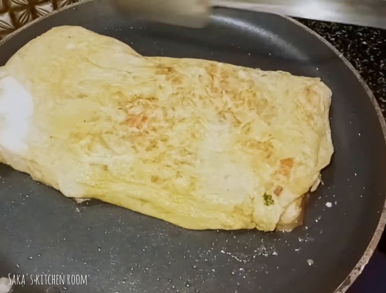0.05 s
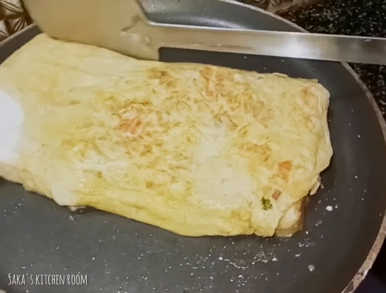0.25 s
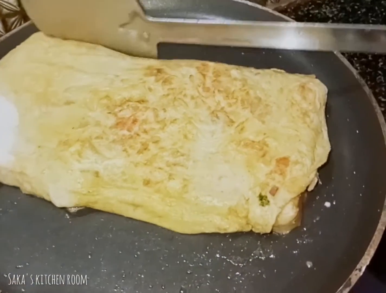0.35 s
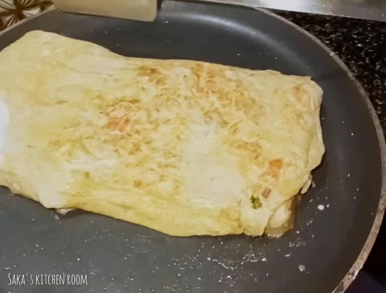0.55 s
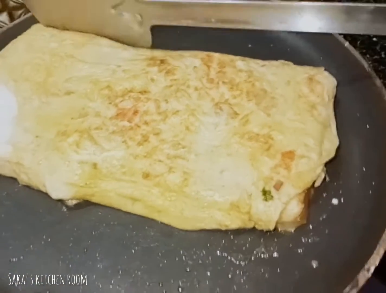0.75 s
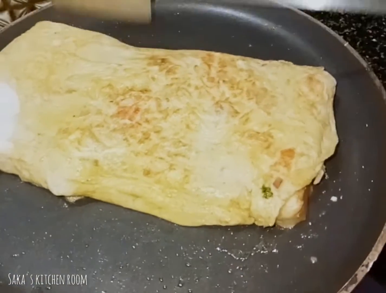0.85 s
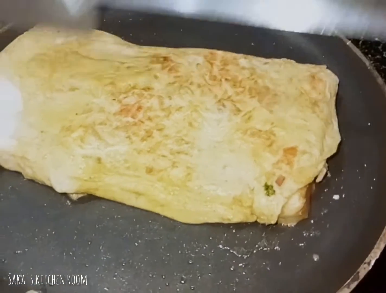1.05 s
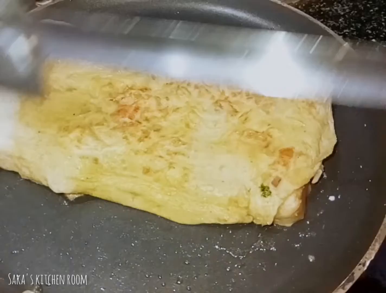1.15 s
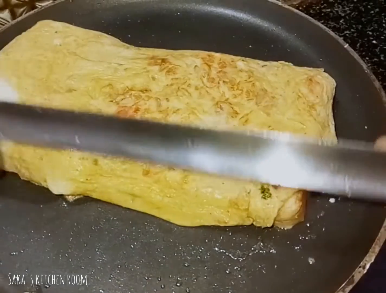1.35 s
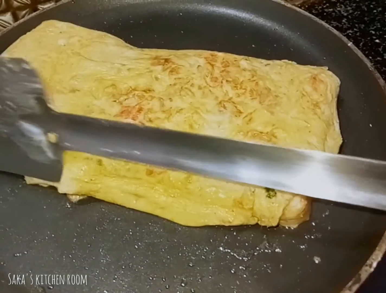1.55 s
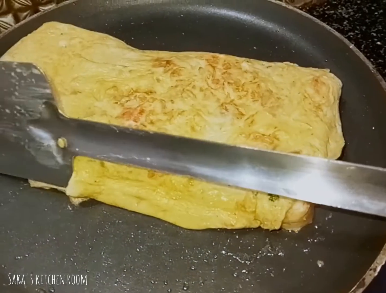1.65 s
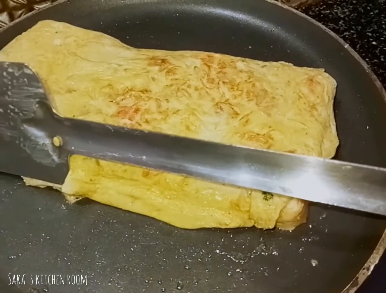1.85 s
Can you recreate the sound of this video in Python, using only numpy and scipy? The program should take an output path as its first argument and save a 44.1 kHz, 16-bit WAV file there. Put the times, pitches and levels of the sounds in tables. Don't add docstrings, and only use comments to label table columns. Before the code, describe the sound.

Steel spatula clanks on a coated pan, once then twice quickly, with soft fizzing oil

```python
import sys
import numpy as np
from scipy import signal
from scipy.fft import rfft, irfft
from scipy.io import wavfile
from scipy.ndimage import map_coordinates

SR = 44100
rng = np.random.default_rng(int(sys.argv[2]) if len(sys.argv) > 2 else 0)


def field_ratio(decibels):
    return 10 ** (np.asarray(decibels, dtype=float) / 20)


def int16_out(signal):
    q = np.round(np.clip(np.atleast_2d(signal).T, -1, 1) * 32767)
    wavfile.write(sys.argv[1], SR, q.astype(np.int16))


N = 83790


def unit(x):
    return x / np.sqrt(np.mean(x ** 2) + 1e-20)


def along(points, hz):
    point_hz, value = np.transpose(points)
    return np.interp(np.log(hz + 1), np.log(point_hz + 1), value)


def coloured(x, points):
    size = 2 ** 12
    gain = field_ratio(along(points, np.fft.rfftfreq(size, 1 / SR)))
    cepstrum = irfft(np.log(gain + 1e-6), size)
    cepstrum[1:size // 2] *= 2
    cepstrum[size // 2 + 1:] = 0
    response = irfft(np.exp(rfft(cepstrum)), size)
    return signal.fftconvolve(x, response)[:len(x)]


def wobble(rate, count):
    knots = rng.standard_normal(int(count * 200 / SR) + 4)
    return map_coordinates(knots, [np.arange(count) * min(rate, 199) / SR])


def add(track, x, s):
    part = track[round(s * SR):][:len(x)]
    part += x[:len(part)]


# pitch_hz [Hz], fade_s [s]
KITCHEN_FADE = [(100, 0.87), (300, 0.63), (1000, 0.52), (3000, 0.53), (6000, 0.37), (12000, 0.47)]


def kitchen(x):
    hz, t, z = signal.stft(rng.standard_normal(SR * 3 // 4), SR, nperseg=256)
    fade_db = -60 * t / along(KITCHEN_FADE, hz)[:, None]
    tail = signal.istft(z * field_ratio(fade_db), SR, nperseg=256)[1]
    delayed = np.pad(x, (130, 0))
    return signal.fftconvolve(delayed, tail / np.linalg.norm(tail))


# pitch_hz [Hz], level_db [dB per Hz]
AIR_COLOUR = [(25, -28), (60, 2.5), (120, -0.5), (250, -6.5), (1000, -9.5), (3000, -9), (8000, -17),
              (15500, -23.5)]


def air():
    level_db = -62 + 2.4 * wobble(4.03, count=N)
    return field_ratio(level_db) * unit(coloured(rng.standard_normal(N), AIR_COLOUR))


# start_s [s], level_db [dB]
FIZZ_ACTIVITY = [(0, -52), (.19, -49.5), (.205, -60), (.3, -50), (.5, -55), (.8, -56), (.85, -57.5),
                 (0.949, -55.5), (1.06, -61), (1.1, -52.5), (1.3, -53.5), (1.35, -61), (1.418, -53),
                 (1.6, -62), (1.8, -52), (1.9, -56)]
# pitch_hz [Hz], level_db [dB per Hz]
FIZZ_COLOUR = [(600, -40), (1800, -21.5), (3300, -7.5), (4300, 2.5), (5400, -0.5), (6600, -15.5),
               (10000, -11.5), (15500, -60)]


def fizz():
    bubbles, spread_db = 500, 8
    place, rarity, side = rng.random((bubbles, 3)).T
    size = field_ratio(-spread_db * np.log(rarity + 1e-4)) * np.sign(side - .5)
    bursts = unit(np.bincount((place * N).astype(int), np.clip(size, -6, 6), N))
    envelope = np.convolve(abs(bursts), np.hanning(48), 'same')
    grains = unit(envelope * rng.standard_normal(N))
    mix = field_ratio(-4) * grains + field_ratio(-1) * rng.standard_normal(N)
    s, level_db = np.transpose(FIZZ_ACTIVITY)
    swell_db = np.interp(np.arange(N) / SR, s, level_db) + 0.61 * wobble(16.44, count=N)
    return unit(coloured(mix, FIZZ_COLOUR)) * field_ratio(swell_db - 3.5)


# start_s [s], peak_db [dB], pitch_hz [Hz], click_db [dB]
OIL_SPITS = [(0.01, -36, 4740, -10), (0.0254, -41.5, 4800, -8), (0.0573, -40, 4470, -1.5),
             (0.1101, -39, 5040, -7), (0.1141, -40, 4280, -13.5), (0.154, -33.5, 4870, -8),
             (0.1714, -50.5, 4850, 5), (0.19, -43.5, 4440, 1), (0.4795, -35, 4630, -15.5),
             (0.5366, -39.5, 4540, -9), (0.6832, -45, 5020, -22), (0.7618, -40, 4340, -30),
             (0.8664, -40, 4710, -14), (0.9354, -42.5, 5200, -32), (0.9537, -36, 4400, -14),
             (1.0909, -39.5, 4360, -7), (1.1298, -43, 4650, -8.5), (1.1559, -40.5, 4600, -16),
             (1.1731, -36.5, 5000, -11.5), (1.1898, -36, 4420, -22.5), (1.2126, -42, 4700, -5),
             (1.231, -39.5, 4530, -7), (1.2488, -38, 4950, -10.5), (1.266, -35.5, 4470, -12.5),
             (1.2887, -37, 4460, -22), (1.3314, -45, 4600, -11), (1.3697, -32.5, 4400, -9.5),
             (1.7357, -44, 3460, -6.5), (1.8128, -40.5, 4450, -7.5), (1.844, -49.5, 4500, 1)]
# pitch_hz [Hz], level_db [dB per Hz]
CLICK_COLOUR = [(500, -52.5), (1200, -5.5), (3000, -9), (8500, -3.5), (12000, -13.5), (15500, -12.5)]


def spits():
    low_hz, low_db, room_db = 1523, -14.5, -3
    swell_s = .0004
    out, t = np.zeros(N), np.arange(SR // 50) / SR
    pulse = (t / swell_s) ** 2 * np.exp(-t / swell_s)
    noises = rng.standard_normal((len(OIL_SPITS), len(t)))
    for (s, peak_db, hz, click_db), noise in zip(OIL_SPITS, noises):
        tone = np.sin(2 * np.pi * hz * t)
        low = field_ratio(low_db) * np.sin(2 * np.pi * low_hz * t)
        click = unit(coloured(noise, CLICK_COLOUR)) * field_ratio(click_db)
        add(out, field_ratio(peak_db + 3) * pulse * (tone + low + click), s - swell_s / 2)
    return out + field_ratio(room_db) * kitchen(out)[:N]


# start_s [s], fullest_s [s], end_s [s], level_db [dB]
SLIDES = [
    (.29, 0.39, .46, -47.5),
    (1.04, 1.167, 2.4, -65.5),
]
# pitch_hz [Hz], level_db [dB per Hz]
SCRAPE_COLOUR = [(500, -26.5), (1200, -1), (1900, -0.5), (3200, 13.5), (5000, 0), (9000, -38.5)]


def scrape():
    t = np.arange(N) / SR
    stroke = np.zeros(N)
    for start, fullest, end, level_db in SLIDES:
        stroke += field_ratio(level_db) * np.interp(t, [start, fullest, end], [0, 1, 0])
    grit = field_ratio(2 * wobble(38.8, count=N))
    return grit * stroke * unit(coloured(rng.standard_normal(N), SCRAPE_COLOUR))


def ringing(pitches, modes, wander, t):
    total = np.zeros(len(t))
    for hz, (level_db, fade_s) in zip(pitches, modes):
        drift = wander * min(1, .5 + hz / 4000) * wobble(46.6, count=len(t))
        tone = np.sin(2 * np.pi * hz * t + drift)
        twin = 0.22 * np.sin(2 * np.pi * hz * 1.004 * t)
        total += field_ratio(level_db - 60 * t / fade_s) * (tone + twin)
    return total


# start_s [s], level_db [dB]
RATTLES = [
    (.244, -5),
    (.253, -21),
]


def rattling(s, t):
    total = np.zeros(len(t))
    for at, level_db in RATTLES:
        late = np.maximum(t + s - at, 0)
        burst = field_ratio(level_db - 60 * late / 0.05) * (1 - np.exp(-late / 0.0033))
        total += (at > s) * burst
    return total


KNOCK_S = [
    .2258,
    1.4326,
    1.5247,
]
# peak_db [dB], rise_s [s], clatter_fade_s [s to -60 dB], ring_db [dB], room_db [dB]
KNOCKS = [
    (-2.5, 0.00061, 0.12, -19, -6.5),
    (-11, 0.00064, 0.16, -14, -4.5),
    (-7.5, 0.0004, 0.29, -16, -10.5),
]
RIM_HZ = [328, 600, 958, 1387, 1452, 1873, 2098, 2529, 2647, 2915, 3280, 3700, 4936, 5981]
BLADE_HZ = [320, 480, 607, 921, 1577, 2309, 2905, 3720, 4156, 5152, 5992, 6799, 7784, 8570]
FLOOR_HZ = [318, 383, 482, 600, 958, 1380, 1576, 1667, 2229, 2309, 2907, 2990, 3634, 4285]
# level_db [dB], fade_s [s to -60 dB]
RIM_RING = [(-12.5, 0.31), (-2.5, 0.14), (-4.5, 0.084), (7, 0.083), (3, 0.1), (-8.5, 0.35), (-11.5, 0.54),
            (-5, 0.3), (-10.5, 0.43), (-5.5, 0.15), (6, 0.039), (3, .05), (-5, 0.066), (-5, 0.095)]
# level_db [dB], fade_s [s to -60 dB]
BLADE_RING = [(-7, .3), (-6, .15), (-6, .2), (-7, .19), (-5, .35), (-6, .25), (-8, .45), (-5, .09),
              (-1, .24), (-9, .4), (-2, .24), (-11, .34), (-22, .2), (-22, .19)]
# level_db [dB], fade_s [s to -60 dB]
FLOOR_RING = [(-10, .6), (-15, .6), (-7, .22), (-7, .2), (-7, .4), (-5, .22), (-1, .28), (-3, .2), (-6, .5),
              (-5, .3), (-3, .62), (-6, .2), (-5, .45), (-7, .28)]
WANDER = (1.3, .2, .2)
# pitch_hz [Hz], level_db [dB per Hz]
CLATTER_COLOURS = [
    [(60, -29), (200, -18), (700, -4.5), (1100, -7), (2700, 3), (4000, -3), (7500, -18), (15500, -47.5)],
    [(50, -70), (120, -15.5), (330, 4), (1600, 0), (3300, -4.5), (4300, -2.5), (9000, -22), (15500, -40)],
    [(50, -60), (120, -21), (300, -0.5), (2000, 1.5), (3000, 0.5), (4500, -10), (9000, -28.5), (13000, -51)],
]


def spatula():
    crack_db, crack_fade_s, tick_db = -5.5, 0.033, 31.5
    out, t = np.zeros(N), np.arange(SR * 3 // 4) / SR
    all_pitches = (RIM_HZ, BLADE_HZ, FLOOR_HZ)
    all_modes = (RIM_RING, BLADE_RING, FLOOR_RING)
    for s, knock, pitches, modes, colour, wander in zip(
            KNOCK_S, KNOCKS, all_pitches, all_modes, CLATTER_COLOURS, WANDER):
        peak_db, rise_s, fade_s, ring_db, room_db = knock
        onset = 1 - np.exp(-t / rise_s)
        crack = field_ratio(crack_db - 60 * t / crack_fade_s)
        shape = (field_ratio(-60 * t / fade_s) + crack) * onset + rattling(s, t)
        tick = field_ratio(tick_db) * min(1, 0.00014 / rise_s) * (np.arange(len(t)) == 10)
        noise = rng.standard_normal(len(t))
        clatter = coloured(noise * shape + tick, colour) / np.std(coloured(noise, colour))
        clatter = field_ratio(peak_db - 11) * clatter
        ring = field_ratio(peak_db + ring_db) * ringing(pitches, modes, wander, t) * onset
        add(out, clatter + ring, s)
        add(out, field_ratio(room_db) * kitchen(clatter + ring / 2), s)
    return out


def scene():
    return (air() + fizz() + spits() + scrape() + spatula())[None]


def low_pass(x):
    return signal.sosfilt(signal.butter(12, 15960, fs=SR, output="sos"), x)


def record(dry):
    low_hz, top_hz = 42.4, 15850
    hz = np.fft.rfftfreq(N, 1 / SR)
    bass_cut = (1j * hz / (low_hz + 1j * hz)) ** 2
    limited = irfft(rfft(dry) * (hz < top_hz) * bass_cut, N)
    return low_pass(limited)


dry = scene()
out = record(dry)
int16_out(out)
```